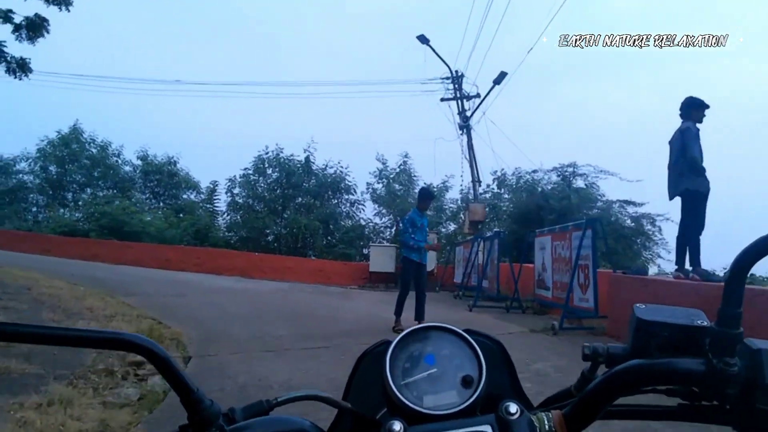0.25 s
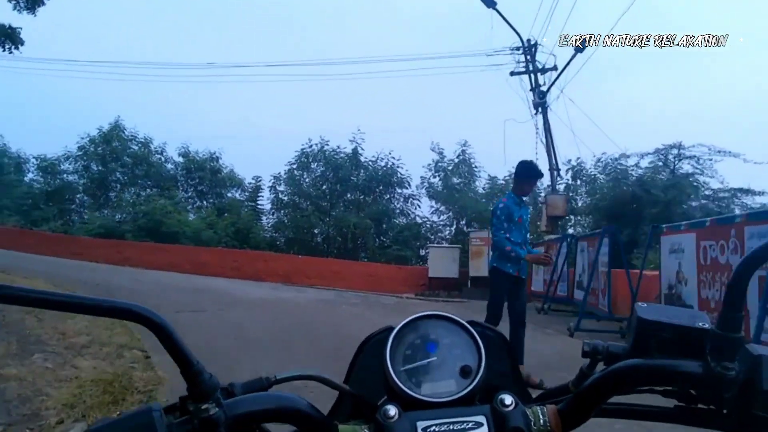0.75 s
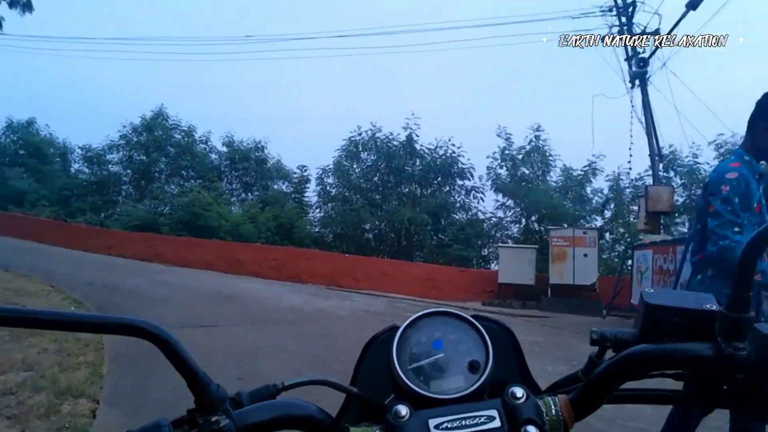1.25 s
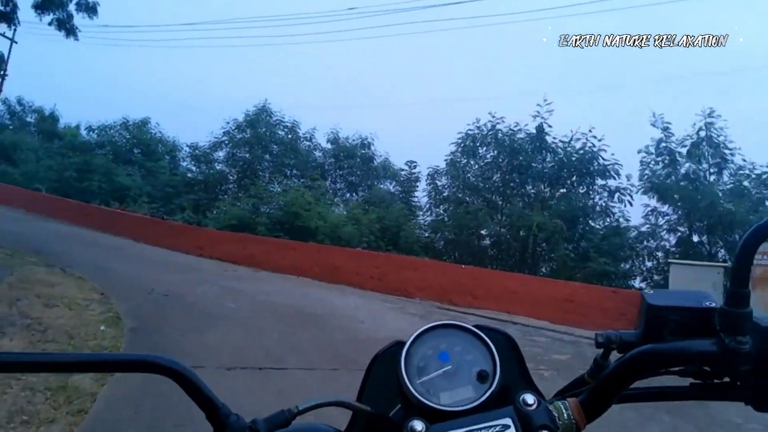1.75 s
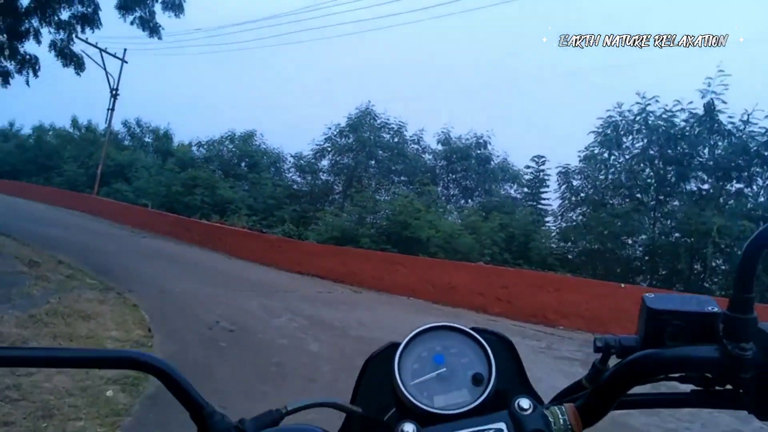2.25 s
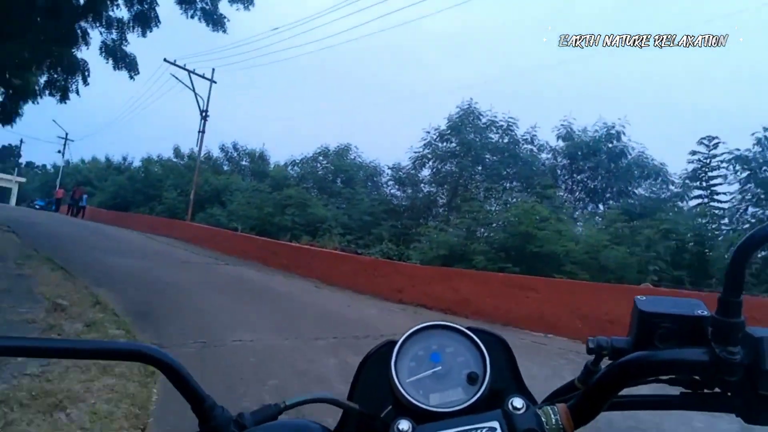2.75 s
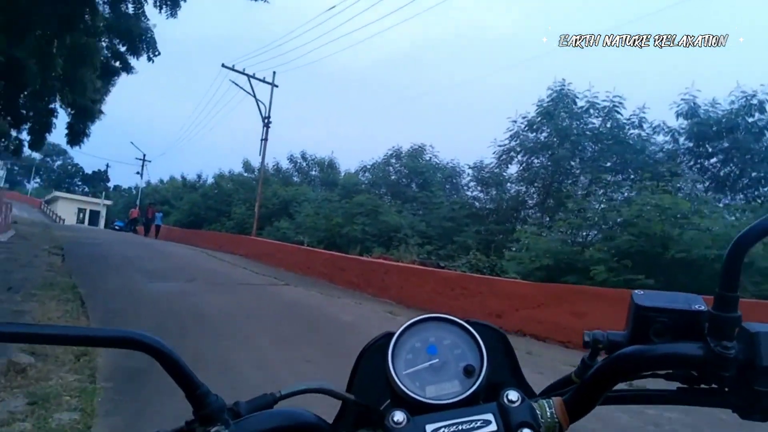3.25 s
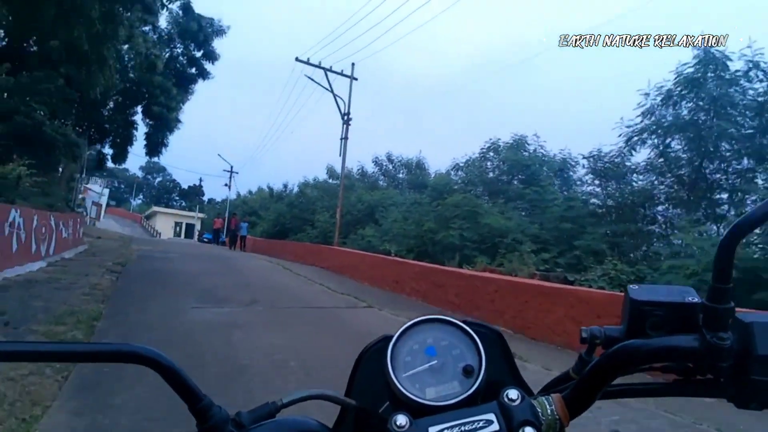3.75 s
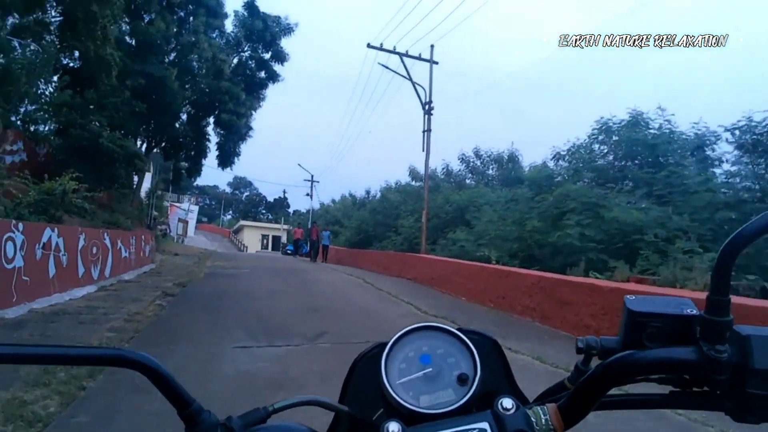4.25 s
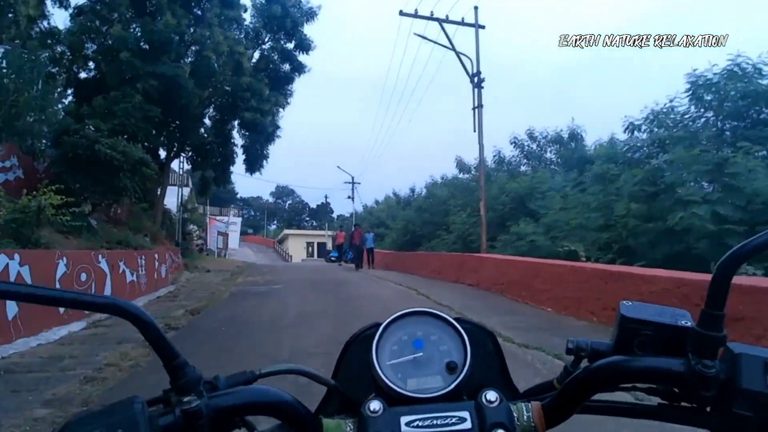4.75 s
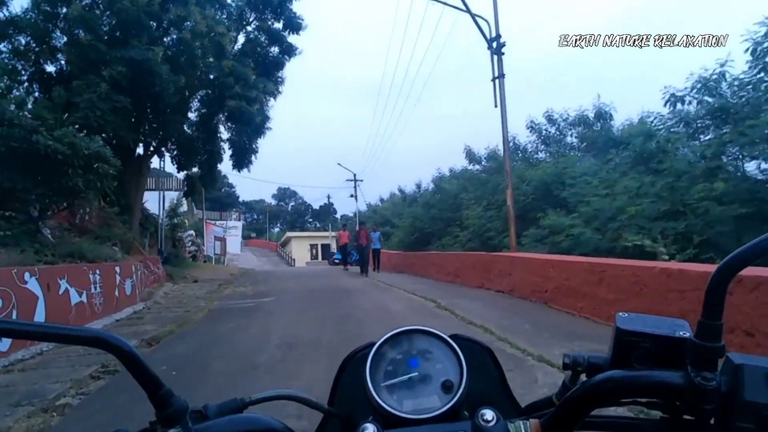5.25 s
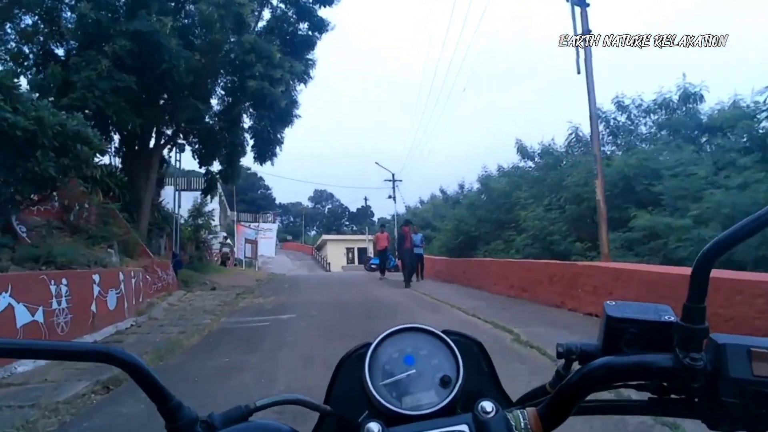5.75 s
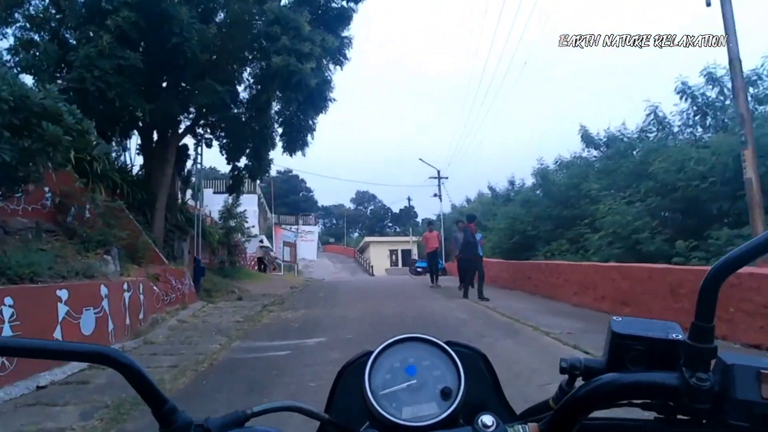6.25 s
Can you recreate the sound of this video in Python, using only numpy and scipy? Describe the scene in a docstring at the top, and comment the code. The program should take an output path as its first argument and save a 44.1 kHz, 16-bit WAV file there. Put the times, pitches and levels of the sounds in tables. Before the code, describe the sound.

Close onboard sound of a motorbike plodding along outdoors: fast even chugging, case knocks, ringing cover and bright valve ticks over a grainy mechanical hiss. Deep, blunt wind blows overload the low end early on, then ease to scattered soft bumps while the engine picks up a little. Near five seconds the buffeting gathers again, and one sharp metallic chink stands out around 5.5 seconds. The engine runs on to the end.

```python
"""A single-cylinder four-stroke motorcycle plods up a hill road at low revs, heard from the rider's seat.
Throughout, gas pulses thud in the exhaust pipe, blows knock the engine case, cover and valve gear, and gears,
chain and tyres wash. About 1 s in, roadside barriers throw the clatter back; from then to 1.7 s eddies of wind
thump hardest on the microphone. The revs rise until 2.5 s, then waver; the valve gear chinks hard now and then,
hardest near 5.5 s, and the eddies crowd again from 4.9 s on."""
import sys
import numpy as np
from scipy import signal
from scipy.fft import rfft, irfft
from scipy.io import wavfile
from scipy.ndimage import uniform_filter1d

SR = 44100
rng = np.random.default_rng(int(sys.argv[2]) if len(sys.argv) > 2 else 0)


def unload_wav(signal):
    """Save mono or channel-first audio to the path in sys.argv[1] as 16-bit WAV at rate SR, clipped to [-1, 1]."""
    wavfile.write(
        sys.argv[1],
        SR,
        np.round(np.clip(np.atleast_2d(signal).T, -1, 1) * 32767).astype(np.int16),
    )


N = 286650
TIME = np.arange(N) / SR


def undb(db):
    """Decibels to gain."""
    return 10 ** (np.asarray(db) / 20)


def level(x, db):
    """Scale to an rms level in dB."""
    return x * undb(db) / np.sqrt(np.mean(x ** 2))


def noise(spectrum):
    """Noise of rms 1, coloured by a table of (frequency [Hz], density [dB/Hz])."""
    hz, db = np.transpose(spectrum)
    bins_hz = np.maximum(np.fft.rfftfreq(N, 1 / SR), 1)
    colour_db = np.interp(np.log(bins_hz), np.log(hz), db)
    white = rng.standard_normal(N)
    return level(irfft(rfft(white) * undb(colour_db), N), 0)


def walk(steps_per_s):
    """Smoothed random steps of rms 1."""
    size = int(SR / steps_per_s)
    steps = np.repeat(rng.standard_normal(N // size + 1), size)[:N]
    smooth = uniform_filter1d(uniform_filter1d(steps, size), size)
    return level(smooth, 0)


def cut(x, hz, kind, order=2):
    """Butterworth low-pass or high-pass."""
    return signal.sosfilt(signal.butter(order, min(hz, .45 * SR), kind, fs=SR, output="sos"), x)


def ring(x, modes):
    """Pass a force through parallel resonances (frequency [Hz], width [Hz], level [dB])."""
    out = 0
    for hz, width_hz, db in modes:
        b, a = signal.iirpeak(hz, hz / width_hz, fs=SR)
        out = out + undb(db) * signal.lfilter(b, a, x)
    return out


def steep_ring(x, hz, width_hz):
    """One resonance passed twice, for steep skirts."""
    mode = [(hz, 1.5 * width_hz, 0)]  # two passes narrow the band again
    return ring(ring(x, mode), mode)


def kicks(cycle, at, scatter_db, jitter_ms):
    """One impulse per engine cycle at a given share of it, each a little different in size and time."""
    numbers = np.arange(np.ceil(cycle[0] - at), cycle[-1] - at)
    size, late = rng.standard_normal((2, len(numbers)))
    when_s = np.interp(numbers + at, cycle, TIME) + late * jitter_ms / 1000
    out = np.zeros(N)
    out[np.clip((when_s * SR).astype(int), 0, N - 1)] = undb(scatter_db * np.clip(size, -2, 2))
    return out


def fade(x, decay_ms):
    """Give every impulse an exponential tail."""
    return signal.lfilter([1], [1, -np.exp(-1000 / (decay_ms * SR))], x)


def rattle(cycle, blows, modes, scatter_db):
    """Each blow sets parts chattering: noise bursts, drawn afresh for each mode, drive its resonance."""
    out = 0
    for hz, width_hz, mode_db in modes:
        force = 0
        for at, db, decay_ms in blows:
            hits = kicks(cycle, at, scatter_db, jitter_ms=.5)
            force = force + undb(db) * fade(hits, decay_ms)
        chatter = force * rng.standard_normal(N)
        out = out + undb(mode_db) * steep_ring(chatter, hz, width_hz)
    return out


def draught():
    """Between and under the eddies, slow air below about 30 Hz presses unevenly on the microphone port."""
    slow = cut(rng.standard_normal(N), 30.4, "low", order=4)
    return level(slow * undb(2 * walk(17)), -59.5)


def faint_eddies():
    """Weak suctions at uneven intervals, as rows like those of the eddy table."""
    rate_per_s, mid_db, spread_db, length_s = 3.7, -50.5, 8.5, .0095
    rows = []
    for k, (late, strong) in enumerate(rng.uniform(-.985, 1, size=(40, 2))):
        s = (k + .5 + .5 * late) / rate_per_s
        rows.append((s, mid_db + spread_db * strong, length_s, 2 * length_s, -1))
    return rows


def eddies():
    """Each eddy pushes or sucks at the port, swings back as the port leaks, and carries turbulence."""
    # eddies crossing the microphone:
    # (time [s], pressure [dB], length [s], rebound length [s], direction [+1 push, -1 suction])
    strong_eddies = [(0.327, -26.5, 0.0054, 0.019, -1), (0.553, -33.5, 0.0047, 0.0082, 1),
                     (0.705, -40.5, 0.0052, .008, -1), (0.802, -18.5, 0.0063, .02, -1),
                     (0.912, -26, 0.0049, 0.018, -1), (0.954, -18, 0.0045, 0.0066, -1),
                     (0.976, -24.5, 0.0036, 0.013, -1), (1.096, -24.5, 0.0073, 0.014, -1),
                     (1.176, -19.5, 0.0043, .012, -1), (1.25, -25, 0.0089, 0.036, 1),
                     (1.301, -10.5, 0.0031, 0.0036, 1), (1.344, -14.5, 0.0028, 0.023, 1),
                     (1.376, -15.5, 0.0074, 0.012, -1), (1.467, -15.5, 0.0032, 0.0073, 1),
                     (1.481, -13.5, 0.004, 0.0066, -1), (1.505, -13.5, 0.0042, 0.01, 1),
                     (1.538, -29, 0.0048, 0.019, 1), (1.64, -12.5, 0.0037, 0.011, -1),
                     (2.117, -29, 0.0059, 0.013, -1), (2.158, -22, 0.0093, 0.02, -1),
                     (2.44, -37.5, 0.007, 0.015, -1), (2.643, -28, 0.012, 0.018, -1),
                     (2.78, -41.5, 0.0084, 0.016, -1), (2.944, -29.5, 0.0055, 0.014, -1),
                     (3.07, -27, 0.0033, 0.014, -1), (3.11, -38, 0.0071, 0.024, -1),
                     (3.15, -42.5, 0.0056, 0.013, 1), (3.3, -46.5, 0.018, 0.015, 1),
                     (3.397, -31, 0.0042, 0.0097, -1), (3.702, -34, 0.0073, 0.011, -1),
                     (3.96, -44, 0.0049, 0.012, 1), (4.064, -36.5, .008, 0.017, 1),
                     (4.312, -38, 0.016, 0.047, 1), (4.398, -23, 0.0079, 0.02, -1),
                     (4.919, -19.5, 0.0043, 0.01, 1), (4.932, -24, 0.0067, 0.016, -1),
                     (5.14, -34.5, 0.0055, 0.03, -1), (5.215, -34.5, 0.01, 0.011, 1),
                     (5.247, -28, .006, 0.015, 1), (5.269, -26, 0.0042, 0.015, -1),
                     (5.356, -22, 0.0053, 0.01, -1), (5.487, -22, 0.0084, 0.014, -1),
                     (5.964, -28.5, 0.0034, 0.017, 1), (6.016, -27, 0.0055, 0.0087, -1),
                     (6.045, -26, 0.0032, 0.011, -1), (6.17, -30.5, 0.0045, 0.016, -1),
                     (6.325, -31.5, 0.013, 0.017, -1), (6.358, -23.5, 0.012, .012, -1),
                     (6.376, -21, 0.0076, 0.037, 1), (6.459, -25, 0.0046, 0.0069, 1),
                     (6.48, -30, 0.007, 0.017, -1)]
    # turbulence inside an eddy: (frequency [Hz], density [dB/Hz])
    churn = [(15, -17), (40, 7.5), (75, -5), (105, -2.5), (150, -3.5), (220, -21.5), (350, -23), (700, -30),
             (2000, -37), (6000, -61)]
    rebound_lag, flank_power = .84, 1.66  # lag in rebound lengths
    churn_db, churn_db_per_db = -21.5, .88  # at 0 dB pressure, and how it follows the pressure
    churn_spread = 1.03  # in lengths of swing plus rebound
    pressure, stir_power = np.zeros(N), np.zeros(N)
    for s, db, length_s, rebound_s, way in list(strong_eddies) + faint_eddies():
        near = np.abs(TIME - s) < .15
        age_s = TIME[near] - s
        swing = np.exp(-np.abs(age_s / length_s) ** flank_power)
        back_age = (age_s - length_s - rebound_lag * rebound_s) / rebound_s
        # equal area to the swing, opposite sign
        back = length_s / rebound_s * np.exp(-np.abs(back_age) ** flank_power)
        pressure[near] += np.sign(way) * undb(db) * (swing - back)
        churn_age = (age_s - rebound_s / 2) / (churn_spread * (length_s + rebound_s))
        stir_power[near] += undb(churn_db + churn_db_per_db * db) ** 2 * np.exp(-churn_age ** 2)
    turbulence = cut(np.sqrt(stir_power) * noise(churn), 38, "high")
    return pressure + turbulence


def running_gear(cycle, strain_db):
    """Gears, chain and tyres: noise flickers band by band and surges as each firing speeds up the crank."""
    # wash of gears, chain and tyres: (frequency [Hz], density [dB/Hz])
    wash_spectrum = [(30, -7), (65, -5), (170, -5), (280, -4.5), (420, -4), (600, -3.5), (750, -0.5),
                     (1150, -1), (1500, -1.9), (2500, -1.4), (3600, -6), (5500, -1), (6500, -11.5),
                     (8000, -19.5), (9600, -27), (11000, -24)]
    _, _, bands = signal.stft(noise(wash_spectrum), SR, nperseg=512)
    flicker = rng.standard_normal(bands.shape)
    flicker = uniform_filter1d(flicker, 3, axis=0)  # across bands
    flicker = uniform_filter1d(flicker, 4, axis=1)  # across frames
    flicker_db = 2.6 * level(flicker, 0)
    wash = signal.istft(bands * undb(flicker_db), SR, nperseg=512)[1][:N]
    # under strain the crank turns less evenly, so the chug deepens
    depth_db = np.clip(.7 + .45 * strain_db, .6, 1.7)
    surge_db = depth_db * np.cos(2 * np.pi * (cycle - .14))
    return level(wash * undb(surge_db), -1.26)


def barriers(clatter):
    """A thin, bright reflection swells and fades as the bike passes roadside barriers."""
    nearest_s, half_pass_s, delay_ms = 1, .55, 12
    echo = np.roll(clatter, int(delay_ms * SR / 1000))
    nearness = np.exp(-((TIME - nearest_s) / half_pass_s) ** 2)
    thin = cut(cut(echo, 2750, "high"), 4500, "low")
    return undb(-2) * nearness * thin


def chinks():
    """Now and then the valve gear strikes much harder: a decaying noise burst rings at its own pitch."""
    # hardest chinks of the valve gear: (time [s], level before decay [dB], ring [Hz], decay [ms])
    hard_chinks = [(0.694, -46, 5130, 4), (1.325, -48.5, 5200, 16), (1.52, -52, 5130, 16),
                   (1.748, -52, 5030, 13), (2.3, -52, 5270, 12), (2.378, -47, 5460, 11),
                   (3.033, -48, 5500, 14), (3.133, -51, 2230, 19), (3.2, -52, 5400, 12),
                   (3.375, -51, 5470, 12), (3.595, -49.5, 5440, 22), (3.652, -53.5, 2160, 36),
                   (4.25, -45.5, 5440, 13), (4.6, -53, 5300, 11), (4.645, -57, 5250, 11),
                   (4.865, -50, 5300, 12), (4.995, -65, 5400, 8.8), (5.081, -49, 5460, 15),
                   (5.212, -47.5, 5500, 14), (5.257, -49, 5430, 24), (5.385, -54, 5500, 11),
                   (5.474, -40.5, 5500, 5.5), (5.68, -48, 5640, 13), (6.455, -52, 5300, 37)]
    width_share = .081  # ring width / pitch
    out, age_s = np.zeros(N + SR), TIME[:SR // 5]
    for s, db, hz, decay_ms in hard_chinks:
        metal = level(steep_ring(rng.standard_normal(len(age_s)), hz, width_share * hz), db)
        swell = (1 - np.exp(-age_s / .0007)) * np.exp(-1000 * age_s / decay_ms)
        start = int(s * SR)
        out[start:start + len(age_s)] += metal * swell
    return out[:N]


def valves(cycle):
    """The valve gear chinks each cycle, never twice alike, with a thin mirror image of its ring on top."""
    # blows in the valve gear: (share of cycle [1], level [dB], decay [ms])
    valve_blows = [(.71, -3, 15), (.72, -2, 3), (.28, -9, 4)]
    # valve gear resonances; the last row is no metal but a thin, faint mirror image of the 5.2 kHz ring,
    # added by the recorder's 16 kHz sampling: (frequency [Hz], width [Hz], level [dB])
    rings_and_image = [(4400, 200, -1), (5020, 520, 10.5), (5260, 38, 14), (5670, 980, 6),
                       (10800, 380, -9.5)]
    return level(rattle(cycle, valve_blows, rings_and_image, scatter_db=3.5), -13.5)


def cam_drive(cycle):
    """The cam drive is jerked several times a cycle and makes the side cover and fins ring."""
    # jerks of the cam drive: (share of cycle [1], level [dB], decay [ms])
    cam_blows = [(.03, -1, 7), (.22, -2, 7), (.5, -5, 7), (.68, -4, 4), (.84, 1, 3)]
    # side cover and cooling fin resonances: (frequency [Hz], width [Hz], level [dB])
    cover_modes = [(708, 44, -2), (834, 28, 7), (1000, 110, -10), (3260, 410, -12), (3600, 150, -7.5)]
    return level(rattle(cycle, cam_blows, cover_modes, scatter_db=3.5), -12)


def piston(cycle):
    """Combustion and piston slap knock on the engine case."""
    # combustion and slap: (share of cycle [1], level [dB], decay [ms])
    piston_blows = [(0.015, 1.5, 4.8), (.2, -6, 6.5), (.46, -9.5, 6), (.84, -6.5, 7)]
    # engine case resonances: (frequency [Hz], width [Hz], level [dB])
    case_modes = [(1107, 104, 2), (1828, 93, 9), (2040, 60, -2), (2070, 1100, -7), (2247, 136, -1.5),
                  (2594, 170, -1.5)]
    return level(rattle(cycle, piston_blows, case_modes, scatter_db=2.5), -10)


def exhaust(cycle, firing_hz):
    """A gas pulse per firing rings the pipe; listed modes alternate in sign; level grows with the revs."""
    # exhaust pipe resonances: (frequency [Hz], width [Hz], level [dB])
    pipe_modes = [(112.5, 22.6, 0.5), (238, 41, -9), (324, 17, -16.5), (252.3, 6.6, -11)]
    pulses = kicks(cycle, at=.948, scatter_db=.7, jitter_ms=.06)
    pipe = 0
    for k, mode in enumerate(pipe_modes):
        pipe = pipe + (-1) ** k * ring(-pulses, [mode])
    thuds = level(cut(pipe, 356, "low"), -59.5)
    return thuds * (firing_hz / firing_hz.mean()) ** .98


def scene():
    """The engine cycle times every part; strain makes the cover ring more and the valves chink less."""
    # engine speed: (time [s], firing rate [1/s])
    firing = [(0.0, 21.52), (0.4, 21.64), (1.1, 21.1), (2.0, 21.88), (2.5, 23.0), (3.4, 23.11),
              (4.0, 22.67), (4.5, 23.26), (5.0, 22.56), (5.5, 23.17), (6.5, 22.76)]
    firing_s, firing_points_hz = np.transpose(firing)
    firing_hz = np.interp(TIME, firing_s, firing_points_hz)
    cycle = .33 + np.cumsum(firing_hz) / SR  # one firing per engine cycle

    # below cruising speed the engine lugs
    cruise_hz, strain_db_per_hz = 22.25, 4
    lug_hz = cruise_hz - firing_hz
    strain_db = strain_db_per_hz * lug_hz

    parts = piston(cycle) + running_gear(cycle, strain_db)
    parts = parts + cam_drive(cycle) * undb(strain_db)
    parts = parts + valves(cycle) * undb(-.4 * strain_db)

    # the mechanism grows with the revs and wanders, slowly and quickly
    mechanism_db = -53 - .5 * lug_hz + .68 * walk(10) + .5 * walk(45)
    mechanism = (parts + barriers(parts)) * undb(mechanism_db)
    wind = draught() + eddies()
    return (exhaust(cycle, firing_hz) + mechanism + chinks() + wind)[None]


def record(dry):
    """A steep elliptic low-pass cuts everything above 11 kHz."""
    return signal.sosfilt(signal.ellip(10, .2, 70, 11000, fs=SR, output="sos"), dry)


dry = scene()
out = record(dry)
unload_wav(out)
```